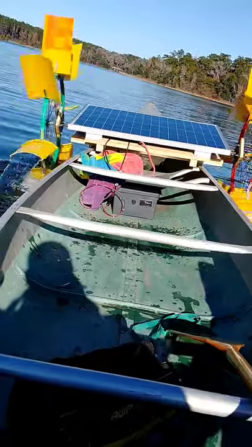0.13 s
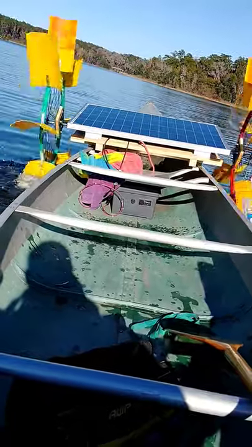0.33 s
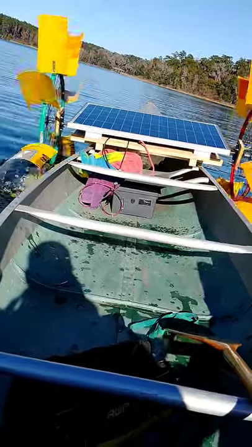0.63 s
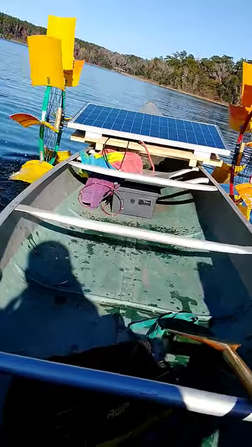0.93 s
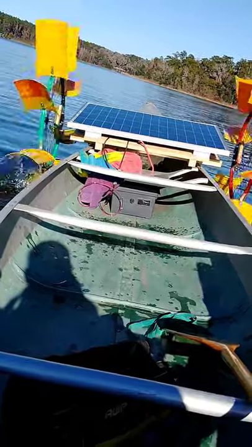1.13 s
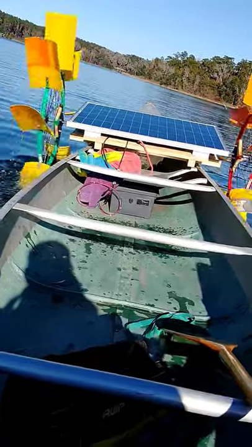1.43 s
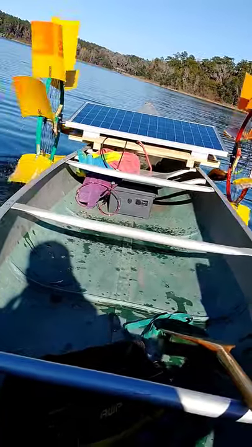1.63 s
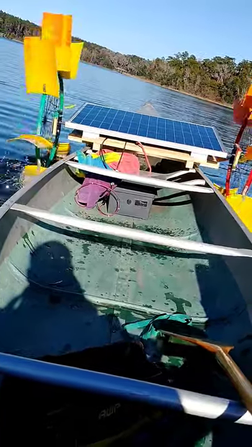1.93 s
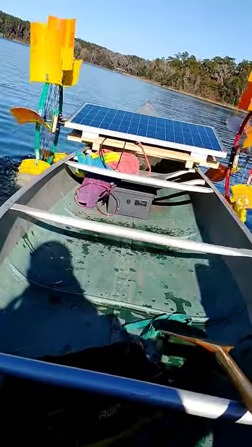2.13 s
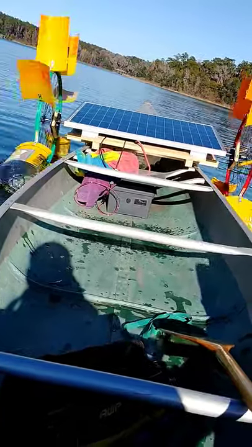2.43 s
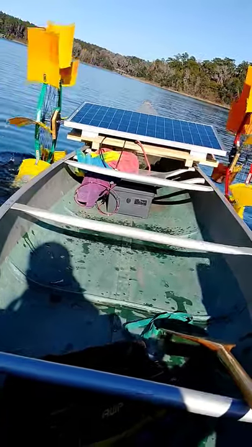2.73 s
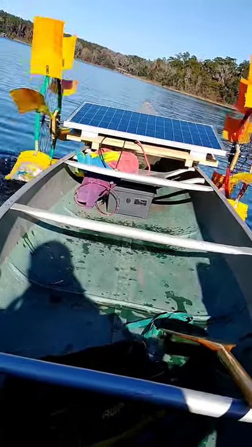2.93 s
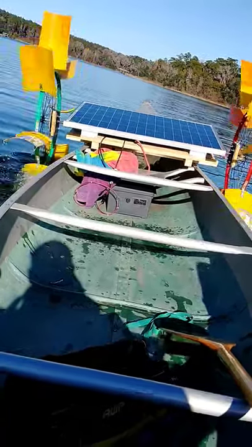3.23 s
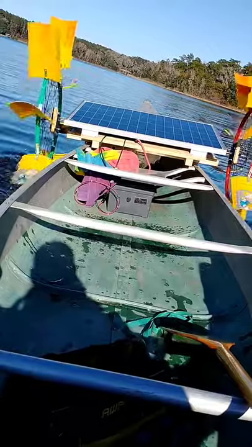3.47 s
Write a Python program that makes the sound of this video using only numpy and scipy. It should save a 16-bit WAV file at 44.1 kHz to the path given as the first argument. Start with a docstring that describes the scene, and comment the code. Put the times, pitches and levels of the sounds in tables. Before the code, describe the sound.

Quiet bubbling, plops and fine spray from plastic paddle blades run throughout beneath strong right-sided wind thuds and a faint hull drone; a light clack precedes a loud rattling knock, then splashes cluster near the end.

```python
"""A canoe driven by two small paddlewheels on a calm lake, heard from inside the boat.
Throughout: hull drone (filtered noise), gusts and pressure swings mostly on the right port, and
churn and spray (ringing grains, clicks, noise). From the first tenth: noise splashes, sine plops.
From 0.5 s: low sloshes, and gulps that sweep up in pitch. At 2.4 s a blade clacks; at 2.6 s one
knock booms, rattles and rings the hull; near 3.3 s plops, a gulp, a clack and splashes cluster."""
import sys
import numpy as np
from scipy import signal
from scipy.fft import rfft, irfft
from scipy.io import wavfile
from scipy.ndimage import uniform_filter1d, map_coordinates

SR = 44100
rng = np.random.default_rng(int(sys.argv[2]) if len(sys.argv) > 2 else 0)


def unload_wav(signal):
    """Save mono or channel-first audio to the path in sys.argv[1] as 16-bit WAV at rate SR, clipped to [-1, 1]."""
    wavfile.write(
        sys.argv[1],
        SR,
        np.round(np.clip(np.atleast_2d(signal).T, -1, 1) * 32767).astype(np.int16),
    )


N = 158760
T = np.arange(N) / SR


def amp(db):
    """Decibels to gain."""
    return 10 ** (np.asarray(db) / 20)


def unit(x):
    """Scale to rms 1."""
    return x / np.sqrt(np.mean(x ** 2))


def pan(left_minus_right_db):
    """Left and right gains for a level difference."""
    return amp(np.array([[left_minus_right_db], [-left_minus_right_db]]) / 2)


def curve(rows):
    """Gain over time from (t/s, level/dB) rows."""
    return amp(np.interp(T, *np.array(rows).T))


def colour(x, points):
    """Filter by (f/Hz, gain/dB) points, interpolated over log frequency; rms 1."""
    hz, db = np.array(points).T
    bin_hz = np.maximum(np.arange(N // 2 + 1) * SR / N, 1)
    gain = amp(np.interp(np.log(bin_hz), np.log(hz), db))
    return unit(irfft(rfft(x) * gain, N))


def noise(likeness):
    """Stereo white noise with the given correlation between channels."""
    c = np.clip(likeness, 0, 1)
    shared = rng.standard_normal(N)
    separate = rng.standard_normal((2, N))
    return np.sqrt(c) * shared + np.sqrt(1 - c) * separate


def walk(knots_per_s):
    """Random control signal, linear between knots; rms 1."""
    knots = rng.standard_normal(N // 8)
    return unit(np.interp(T * knots_per_s, np.arange(len(knots)), knots))


def envelope(start_s, attack_s, hold_s, decay_s):
    """Linear rise over attack_s; exponential fall from hold_s after the start."""
    age = T - start_s
    rise = np.clip(age / attack_s, 0, 1)
    fall = np.exp(-np.clip((age - hold_s) / decay_s, 0, 20))
    return rise * fall


ECHO_SPAN_S, ECHO_DECAY_S, ECHO_DB = .014, 0.0073, -2


def reflect(x, count=9):
    """The walls of the open hull add a few close reflections, different at each port."""
    out = []
    for channel in x:
        lag, sign = rng.random((count, 2)).T
        lag_s = .0006 + lag * ECHO_SPAN_S
        taps = np.sign(sign - .5) * np.exp(-lag_s / ECHO_DECAY_S)
        response = np.zeros(SR // 10)
        response[(lag_s * SR).astype(int)] = amp(ECHO_DB) * taps / np.linalg.norm(taps)
        response[0] = 1  # direct sound
        response = response / np.linalg.norm(response)
        out.append(signal.fftconvolve(channel, response)[:N])
    return np.array(out)


GRAIN_PAN_DB, PORT_LAG_S, WATER_LIKENESS = 1.5, .00025, 0.23


def grains(per_s, low_hz, high_hz, cycles, rise, spread_db):
    """Random small bubbles, each a decaying sine from its own direction; pitch may rise as it rings."""
    out = np.zeros((2, N))
    for when, pitch, size, side in rng.random((int(per_s * N / SR), 4)):
        hz = low_hz * (high_hz / low_hz) ** pitch
        start = int(when * N)
        decay_s = cycles / hz
        clock = T[:min(int(6 * decay_s * SR), N - start)]
        port_shift = np.array([[1], [-1]]) * (side - .5) * PORT_LAG_S
        age = np.maximum(clock + port_shift - PORT_LAG_S / 2, 0)
        phase = 2 * np.pi * hz * age * (1 + rise * age / decay_s / 2)
        ring = np.sin(phase) * np.exp(-age / decay_s)
        strength = min(-np.log(1 - size), 3.6)
        level = amp(spread_db * strength) * hz / high_hz
        out[:, start:start + age.shape[1]] += ring * level * pan(GRAIN_PAN_DB * (2 * side - 1))
    return out


HULL_DB = -52.5
# drone spectrum [f/Hz, relative gain/dB]
HULL_SPECTRUM = [(20, -13), (45, 3), (85, -8.5), (130, -2.5), (170, -5.5), (220, -4.5), (330, -15),
                 (480, -24.5), (1000, -42), (3000, -78)]


def hull():
    """The moving boat drones low: mono filtered noise, slightly unsteady in level."""
    return amp(HULL_DB) * colour(noise(likeness=1.0), HULL_SPECTRUM) * amp(0.5 * walk(31))


THUMP_CYCLES, THUMP_CREST, THUMP_LEFT_DB = 0.36, 0.11, -36
# single buffets [t/s, swing level/dB, f/Hz]
BUFFETS = [(.071, -13, 97.6), (0.208, -16, 105), (0.281, -15, 99), (0.349, -13.5, 143), (0.529, -16, 138),
           (0.547, -10.5, 109.5), (.672, -13, 154), (1.059, -12.5, 111), (1.107, -11, 134.7),
           (1.275, -5.5, 159.6), (1.295, -7.5, 135.4), (1.369, -15, 141.5), (1.535, -13.5, 135.5),
           (1.81, -8, 125.3), (1.855, -11.5, 154.5), (1.884, -13.5, 143), (1.934, -9, 112.5),
           (2.004, -17, 111.5), (2.022, -12.5, 149.6), (2.04, -9, 135.3), (2.223, -16.5, 155.5),
           (2.354, -12, 126), (2.39, -14, 145), (2.422, -10, 131), (2.785, -9.5, 141.7), (2.998, -7, 120.6),
           (3.122, -15.5, 153), (3.226, -15, 136.4), (3.323, -15, 141), (3.389, -13, 124),
           (3.521, -20, 121), (3.561, -11, 111)]


def thumps():
    """Single eddies hit the right port: one short swing of pressure with a sharp crest."""
    out = 0
    for at, db, hz in BUFFETS:
        turn = np.clip((T - at) * hz, -10, 10)  # cycles from the peak
        swing = np.cos(2 * np.pi * turn) / np.cosh(turn / THUMP_CYCLES)
        crest = np.cos(2 * np.pi * 2 * turn) / np.cosh(2 * turn / THUMP_CYCLES)
        out = out + amp(db) * (swing + THUMP_CREST * crest)
    return out * amp([[THUMP_LEFT_DB], [0]])


BREEZE_LEFT_DB, BREEZE_RIGHT_DB, EDDY_S = -55.5, -29.5, 0.035
SWIRL_PER_S, SWIRL_OCTAVES, SWIRL_DB = 75, .22, 2.6
BURST_HZ, BURST_DB, BURST_POWER, PORT_LIMIT = 386, -31, 1.474, 0.8
# eddy spectrum [f/Hz, relative gain/dB]
WIND_SPECTRUM = [(20, -38.5), (40, -18), (65, 1.5), (100, 2), (140, -3.5), (200, -11), (300, -25.5),
                 (450, -38), (700, -53.5), (1100, -66), (2500, -96.5)]
# gusts on the microphone [centre t/s, 1/e half length of power/s, left level/dB, right level/dB]
GUST_ROWS = [(0.062, 0.016, -32.5, -26), (.14, 0.005, -54, -31), (0.246, 0.0077, -60, -31.5),
             (0.345, 0.0186, -34, -22.5), (0.425, 0.037, -46, -24.5), (0.525, 0.015, -42, -21.5),
             (0.582, 0.012, -34, -26.5), (0.674, 0.018, -58, -21), (0.904, 0.037, -44, -24.5),
             (1.03, 0.018, -52, -28.5), (1.178, 0.0099, -57, -17.5), (1.253, .02, -49, -15.5),
             (1.404, 0.072, -61, -26), (1.5, 0.039, -53, -26), (1.673, 0.066, -68, -27),
             (1.86, 0.032, -54, -19), (1.961, 0.033, -57, -21.5), (2.014, 0.025, -55, -16),
             (2.088, 0.01, -47, -21), (2.192, 0.033, -54, -25.5), (2.373, 0.017, -52, -25.5),
             (2.571, 0.0096, -62, -20), (2.8, 0.033, -53, -19.5), (2.909, 0.021, -49.5, -22.5),
             (2.965, 0.015, -40, -17.5), (3.055, 0.012, -45, -19), (3.141, 0.024, -38.5, -19),
             (3.486, 0.055, -62, -37), (3.509, 0.06, -50, -23)]


def wind():
    """Eddies tumble over each port; fast swirl is louder and higher, gusts add bursts, ports overload softly."""
    swirl = np.clip(walk(SWIRL_PER_S), -2, 2)
    travel = np.cumsum(2 ** (SWIRL_OCTAVES * swirl))  # read position, samples
    still = colour(noise(0), WIND_SPECTRUM)
    eddies = np.array([map_coordinates(port, [travel], order=3, mode="mirror") for port in still])
    local_power = uniform_filter1d(eddies ** 2, int(EDDY_S * SR))
    local_power = uniform_filter1d(local_power, int(EDDY_S * SR / 2))
    surge = amp(SWIRL_DB * swirl)
    surge = surge / np.sqrt(uniform_filter1d(surge ** 2, size=4000))
    eddies = unit(eddies / np.sqrt(local_power) * surge)  # evened out, then surged

    power = amp([[BREEZE_LEFT_DB], [BREEZE_RIGHT_DB]]) ** 2
    for at, half_s, left_db, right_db in GUST_ROWS:
        power = power + amp([[left_db], [right_db]]) ** 2 * np.exp(-((T - at) / half_s) ** 2)
    pressure = eddies * np.sqrt(power) + thumps()

    band = [(BURST_HZ / 4, -20), (BURST_HZ, 0), (2 * BURST_HZ, -16), (5 * BURST_HZ, -55)]
    strength = np.abs(signal.hilbert(pressure)) ** BURST_POWER
    burst = amp(BURST_DB) * colour(noise(0), band) * strength
    return PORT_LIMIT * np.tanh((pressure + burst) / PORT_LIMIT)


KNOCK_S = 2.619
BOOM_HZ, BOOM_DB, BOOM_ATTACK_S, BOOM_HOLD_S, BOOM_DECAY_S = 140.4, -17.5, .013, .025, .016
BOOM_PAN_DB, HULL_WAVER = -2, 0.018
CRACK_DB, CRACK_ATTACK_S, CRACK_HOLD_S, CRACK_DECAY_S = -36.5, 0.0043, 0.027, 0.025
CRACK_PAN_DB, CRACK_GRAIN, CRACK_END_S, CRACK_STOP_S = -5.5, 0.22, 0.069, 0.0055
CLACK_DB, CLACK_LAG_S, CLACK_DECAY_S = -31, .008, .003
TAIL_DB, TAIL_DECAY_S = -27.5, 0.1
# rattling crack [f/Hz, relative gain/dB]
CRACK_SPECTRUM = [(200, -10), (420, 8), (520, 2.5), (700, 6), (850, -3), (1100, -4), (1600, -4.5),
                  (2150, -5), (3000, -11), (4300, -17), (5700, -10.5), (6300, -13), (7200, -8.5),
                  (9500, -15.5), (13000, -20), (16000, -28)]
# hardest contact within the knock [f/Hz, relative gain/dB]
CONTACT_SPECTRUM = [(300, -4), (700, -1), (1400, 0), (2200, -3), (3500, -9), (7000, -20), (15000, -33)]
# noise tail of the shell [f/Hz, relative gain/dB]
TAIL_SPECTRUM = [(90, -1), (140, 11.5), (190, 11.5), (250, 4.5), (320, 0.5), (380, -3), (450, -8.5),
                 (560, -13), (1000, -24), (2100, -26), (3300, -39.5), (7000, -53.5), (15000, -57.5)]
# modes of the hull [f/Hz, level/dB, t60/s]
SHELL_MODES = [(137.55, -20.5, 0.72), (188, -48, 0.39), (232, -29.5, 1), (279.6, -32, 0.96), (289, -41, 1),
               (439, -40, 0.79), (451, -41.5, 0.52), (750, -47, 0.51), (1033, -63, 1), (1388, -45, 0.24),
               (2080, -46.5, 0.39), (2184, -45.5, 0.22), (2735, -43.5, 0.21)]
# modes of the loose parts, before the crack's cutoff [f/Hz, level/dB, t60/s]
LOOSE_MODES = [(1034, -49, .12), (2126, -46, .1), (2396, -49, .08), (3591, -55, .1), (5749, -52, .13),
               (6977, -53, .15), (7316, -54, .15), (8662, -59, .13), (12690, -45, .05)]


def ring_modes(modes, clock, age):
    """Sum of decaying sine modes with a 6 ms onset."""
    total = 0
    for hz, db, t60_s in modes:
        total = total + amp(db) * np.sin(2 * np.pi * hz * clock) * np.exp(-np.log(1000) * age / t60_s)
    return -np.minimum(age / .006, 1) * total


def knock():
    """A hard blow: the hull booms, loose parts clack, rattle and ring, and the shell rings on."""
    age = np.maximum(T - KNOCK_S, 0)
    boom = -amp(BOOM_DB) * np.sin(2 * np.pi * BOOM_HZ * age)
    boom = boom * envelope(KNOCK_S, BOOM_ATTACK_S, BOOM_HOLD_S, BOOM_DECAY_S)
    wavering_clock = age + HULL_WAVER * np.cumsum(walk(120) * (age > 0)) / SR
    shell = ring_modes(SHELL_MODES, wavering_clock, age)

    rattle = amp(CRACK_DB) * envelope(KNOCK_S, CRACK_ATTACK_S, CRACK_HOLD_S, CRACK_DECAY_S)
    rattle = rattle * np.exp(CRACK_GRAIN * walk(400))
    crack = colour(reflect(noise(likeness=0.17)), CRACK_SPECTRUM) * rattle
    crack = (crack + ring_modes(LOOSE_MODES, age, age)) * pan(CRACK_PAN_DB)
    crack = crack * envelope(KNOCK_S, 0.00092, CRACK_END_S, CRACK_STOP_S)

    clack = amp(CLACK_DB) * colour(noise(likeness=0.41), CONTACT_SPECTRUM)
    clack = clack * envelope(KNOCK_S + CLACK_LAG_S, 0.0015, 0.00087, CLACK_DECAY_S)
    tail = amp(TAIL_DB) * colour(noise(likeness=0.44), TAIL_SPECTRUM)
    tail = tail * envelope(KNOCK_S, 0.018, 0.036, TAIL_DECAY_S)
    return (boom + shell + clack + tail) * pan(BOOM_PAN_DB) + crack


# low sloshes [t/s, level/dB, centre f/Hz, decay/s, L-R/dB]
SLOSH_ROWS = [(0.507, -51.5, 477, 0.011, -13), (1.852, -53, 588, 0.0027, 1.5), (1.929, -57, 640, 0.015, -9),
              (2.006, -54.5, 495, 0.029, -8)]


def sloshes():
    """Heavier lumps of water slop beside the hull: low-band noise bursts."""
    out, water = 0, noise(likeness=0.74)
    for at, db, hz, decay_s, pan_db in SLOSH_ROWS:
        body = colour(water, [(hz / 2, -18), (hz, 0), (2 * hz, -20), (4 * hz, -50)])
        out = out + amp(db) * body * envelope(at, 0.0036, 0.0057, decay_s) * pan(pan_db)
    return out


# ring of a plastic blade [f/Hz, relative gain/dB]
BLADE_SPECTRUM = [(500, -26.5), (1100, -5.5), (1800, -7.5), (2150, 0), (2500, 0), (2700, 1.5), (2950, 2),
                  (3300, -6.5), (4000, -13), (4800, -22.5), (15000, -29)]
# clacks of a blade [t/s, level/dB, decay/s, L-R/dB]
CLACK_ROWS = [(2.365, -47.5, 0.018, -1), (3.322, -60, 0.0094, 1)]


def clacks():
    """A plastic blade clacks and rings briefly: noise shaped by its resonance."""
    out, body = 0, colour(noise(likeness=0.27), BLADE_SPECTRUM)
    for at, db, decay_s, pan_db in CLACK_ROWS:
        out = out + amp(db) * body * envelope(at, .0007, 0.003, decay_s) * pan(pan_db)
    return out


GULP_S, GULP_ATTACK_S, GULP_ROUGH, GULP_PAN_DB = .052, .014, .4, 3
# air pockets closing behind a blade [t/s, level/dB, starting f/Hz, rise/(octaves per s)]
GULP_ROWS = [(.652, -53, 540, 28), (2.229, -54.5, 460, 36), (3.338, -55, 580, 26)]


def gulps():
    """Air pockets shrink behind the blades, so their pitch sweeps up."""
    out, flutter, waver = 0, 1 + GULP_ROUGH * walk(330), 1 + 0.026 * walk(300)
    for at, db, hz, octaves_per_s in GULP_ROWS:
        age = np.clip(T - at, 0, GULP_S)
        phase = np.cumsum(hz * 2 ** (octaves_per_s * age) * waver) / SR
        swell = np.interp(age, [0, GULP_ATTACK_S, GULP_S], [0, 1, 0])
        out = out + amp(db) * swell * np.sin(2 * np.pi * phase)
    return out * flutter * pan(GULP_PAN_DB)


PLOP_ROUGH = .4
# large single bubbles [t/s, level/dB, f/Hz, decay/s]
PLOP_ROWS = [(.105, -61, 1800, 0.011), (.14, -51.5, 784, 0.051), (0.197, -55, 1333, 0.011),
             (0.214, -54, 914, 0.024), (1.053, -50.5, 1853, 0.007), (1.085, -53.5, 1880, 0.0068),
             (1.15, -61, 1247, 0.043), (1.49, -44, 729, 0.044), (1.579, -56.5, 1370, 0.037),
             (1.971, -62, 1030, 0.028), (2.046, -56.5, 1950, 0.01), (2.251, -57.5, 2020, .024),
             (3.307, -47.5, 1430, .008), (3.325, -49.5, 2400, 0.011)]


def plops():
    """Large bubbles ring briefly, unsteady in level and pitch."""
    out, flutter = 0, 1 + PLOP_ROUGH * walk(180)
    wavering_clock = np.cumsum(1 + .05 * walk(220)) / SR
    for at, db, hz, decay_s in PLOP_ROWS:
        tone = np.sin(2 * np.pi * hz * wavering_clock)
        out = out + amp(db) * envelope(at, 0.01, 0.0031, decay_s) * tone
    return out * flutter * pan(3.1)


SPLASH_WIDTH, SPLASH_ATTACK_S, SPLASH_GRAIN = 0.42, 0.00046, 0.4  # width in natural log of f
SPLASH_FIZZ_DB, SPLASH_SKIRT_DB, SNAP_DB, SNAP_DECAY_S = 1.5, -9, -5, 0.00047
# slaps and splashes of the blades [t/s, level/dB, centre f/Hz, decay/s, L-R/dB]
SPLASH_ROWS = [(0.075, -60.5, 2730, 0.02, 0), (0.166, -60.5, 7440, 0.012, -4),
               (0.341, -55.5, 3150, 0.015, -1), (0.338, -62, 10500, 0.0076, -2),
               (.325, -63, 8450, 0.0057, 2), (.445, -64, 9000, .003, 0), (0.483, -58.5, 2830, 0.013, -1),
               (0.551, -64, 2580, 0.012, 1), (0.655, -66, 7100, 0.005, -5), (0.756, -62, 10000, 0.0042, -5),
               (0.809, -66.5, 6460, 0.0048, 3), (0.935, -64.5, 5500, 0.015, 3),
               (1.35, -65.5, 8000, 0.0045, 1.5), (1.576, -62.5, 5740, 0.0066, 2),
               (1.596, -56.5, 6160, 0.0035, -3), (1.693, -64, 3970, 0.0064, 3),
               (1.79, -65, 6000, 0.0039, -1), (1.939, -61, 3940, 0.0027, 2), (2.032, -62, 3170, 0.011, 0),
               (2.09, -60.5, 2870, 0.0073, 0), (2.429, -64, 7900, 0.0068, -1),
               (0.343, -61, 11000, 0.0027, -5), (0.652, -63, 10900, 0.0017, -2),
               (2.531, -65.5, 3370, 0.0098, 6), (2.883, -62, 6500, 0.0051, -4.5),
               (3.091, -62, 8000, 0.0088, -2.5), (3.261, -53.5, 6700, 0.0095, -1),
               (3.253, -60.5, 3100, 0.019, -3)]


def band_noise(x, order, edges_hz):
    """Butterworth band-pass; rms 1."""
    return unit(signal.sosfilt(signal.butter(order, edges_hz, "band", fs=SR, output="sos"), x))


def splashes():
    """A blade or thrown drop meets the lake: a dry tick, then a burst of hiss and tiny bubbles."""
    fizz = unit(grains(2400, 1747, 12480, cycles=22, rise=0.04, spread_db=0.5))
    burst = noise(likeness=0.16) + amp(SPLASH_FIZZ_DB) * fizz
    burst = burst * np.exp(SPLASH_GRAIN * walk(700))
    out = 0
    for at, db, hz, decay_s, pan_db in SPLASH_ROWS:
        edges_hz = hz * np.exp(np.array([-SPLASH_WIDTH, SPLASH_WIDTH]) / 2)
        edges_hz = np.clip(edges_hz, 100, SR / 2 - 1000)
        core = band_noise(burst, 2, edges_hz)
        skirt = band_noise(burst, 1, edges_hz)
        body = core + amp(SPLASH_SKIRT_DB) * skirt
        body = body * envelope(at, SPLASH_ATTACK_S, SPLASH_ATTACK_S, decay_s)
        snap = amp(SNAP_DB) * unit(burst) * envelope(at, 0.00037, 0.00028, SNAP_DECAY_S)
        out = out + (body + snap) * amp(db) * pan(pan_db)
    return out


TICKS_PER_S, TICK_SPREAD_DB, TICK_DB, TICK_DECAY_S = 170, 4.5, -5, .0003


def ticks():
    """Tiny drops burst on the water: dry clicks of very uneven size, decaying noise each."""
    clicks = np.zeros((2, N))
    for when, size, side in rng.random((int(TICKS_PER_S * N / SR), 3)):
        port_shift = np.array([1, -1]) * (side - .5) * PORT_LAG_S * SR
        ports = (when * (N - 100) + 50 + port_shift).astype(int)
        clicks[[0, 1], ports] += amp(TICK_SPREAD_DB * min(-np.log(1 - size), 3.3))
    decaying = signal.lfilter([1], [1, -np.exp(-1 / (TICK_DECAY_S * SR))], clicks)
    return decaying * noise(WATER_LIKENESS)


BUBBLES_PER_S, BUBBLE_CYCLES, BUBBLE_RISE, BUBBLE_SPREAD_DB = 420, 9, 0.098, 4.5
DROPS_PER_S, DROP_CYCLES, DROP_SPREAD_DB = 520, 6, 4
BUBBLE_DB, WASH_DB, DROP_DB, MIST_DB = -5, -4, -5, -6.5
CHURN_PAN_DB, SPRAY_PAN_DB = 0.5, -1
# churned water [f/Hz, relative gain/dB]
CHURN_SPECTRUM = [(150, -19.5), (350, 3), (520, 2), (740, 7), (1100, -2.5), (1600, -4.5), (2100, -4),
                  (2800, -7), (3600, -41.5), (6000, -44)]
# fine spray [f/Hz, relative gain/dB]
SPRAY_SPECTRUM = [(1500, -20.5), (2800, -5.5), (3500, 0.5), (4400, -1), (5600, 1), (7200, 0), (9000, -3.5),
                  (12000, -6.5), (15500, -5.5)]
# churn over time [t/s, level/dB]
CHURN_CURVE = [(.04, -57.5), (.1, -60.5), (.23, -57), (.3, -59), (.43, -68), (.5, -62.5), (.61, -64),
               (.86, -60.5), (1.08, -61.5), (1.25, -64), (1.45, -62.5), (1.6, -59.5), (1.82, -63),
               (2.04, -58.5), (2.18, -61.5), (2.48, -63), (2.8, -62.5), (3.03, -62.5), (3.15, -61),
               (3.23, -61), (3.32, -57), (3.48, -65.5), (3.6, -62)]
# spray over time [t/s, level/dB]
SPRAY_CURVE = [(.05, -70), (.1, -71), (.2, -66), (.31, -72), (.44, -76.5), (.62, -72), (.74, -71.5),
               (.86, -66.5), (.96, -69.5), (1.17, -75.5), (1.33, -71), (1.43, -72), (1.55, -69.5),
               (1.72, -72.5), (1.83, -73), (2.04, -66), (2.17, -72), (2.32, -78), (2.56, -72),
               (2.78, -65.5), (2.93, -73.5), (3.13, -71.5), (3.33, -74), (3.5, -77), (3.6, -70)]


def paddlewheels():
    """Blades churn bubbles into a wash of water and shed drops into a fine spray."""
    bubbles = grains(BUBBLES_PER_S, 400, 3600, BUBBLE_CYCLES, BUBBLE_RISE, BUBBLE_SPREAD_DB)
    bubbles = colour(bubbles, CHURN_SPECTRUM)
    wash = colour(noise(WATER_LIKENESS), CHURN_SPECTRUM) * amp(3.5 * walk(40))
    drops = colour(grains(DROPS_PER_S, 2600, 15000, DROP_CYCLES, 0, DROP_SPREAD_DB), SPRAY_SPECTRUM)
    mist = colour(noise(WATER_LIKENESS), SPRAY_SPECTRUM) * amp(0.51 * walk(98))
    clicks = colour(ticks(), SPRAY_SPECTRUM)
    churn = curve(CHURN_CURVE) * (amp(BUBBLE_DB) * bubbles + amp(WASH_DB) * wash)
    spray = amp(DROP_DB) * drops + amp(MIST_DB) * mist + amp(TICK_DB) * clicks
    spray = curve(SPRAY_CURVE) * spray
    return churn * pan(CHURN_PAN_DB) + spray * pan(SPRAY_PAN_DB)


def scene():
    """Boat, wind and water together; only wheels and plops pass through the hull reflections here."""
    background = hull() + wind()
    events = knock() + sloshes() + clacks() + gulps() + splashes()
    return background + events + reflect(paddlewheels() + plops())


TOP_HZ = 15800


def record(dry):
    """The recorder cuts the top of the treble; both ends are eased over 4 ms."""
    ease = np.clip(np.minimum(T, T[-1] - T) / .004, 0, 1)
    eased = dry * np.sin(np.pi / 2 * ease) ** 2
    return signal.sosfilt(signal.ellip(8, .2, 70, TOP_HZ, fs=SR, output="sos"), eased)


dry = scene()
out = record(dry)
unload_wav(out)
```